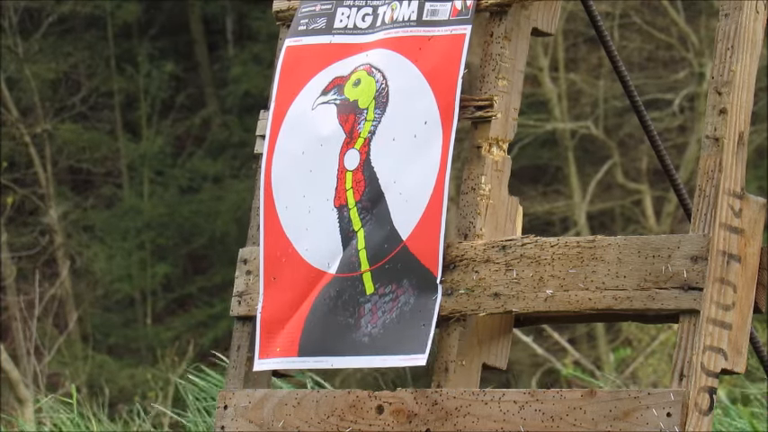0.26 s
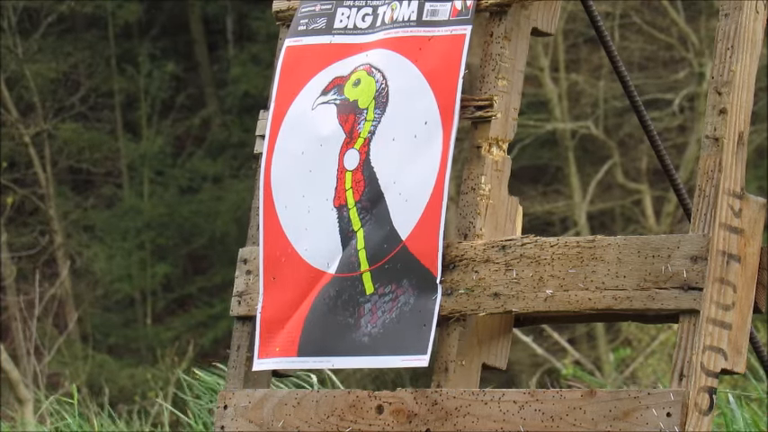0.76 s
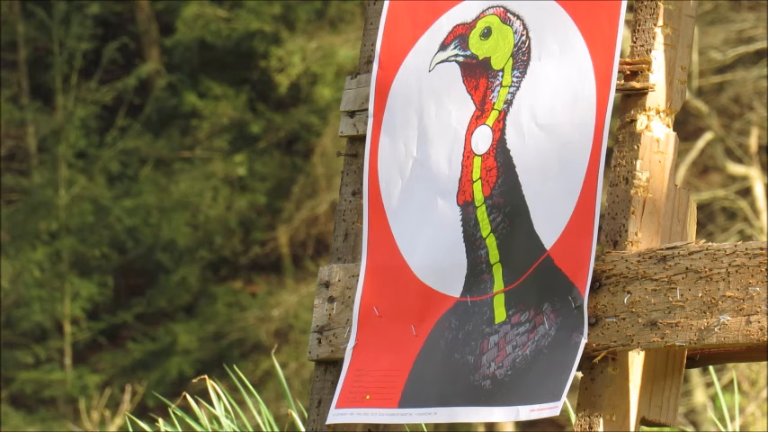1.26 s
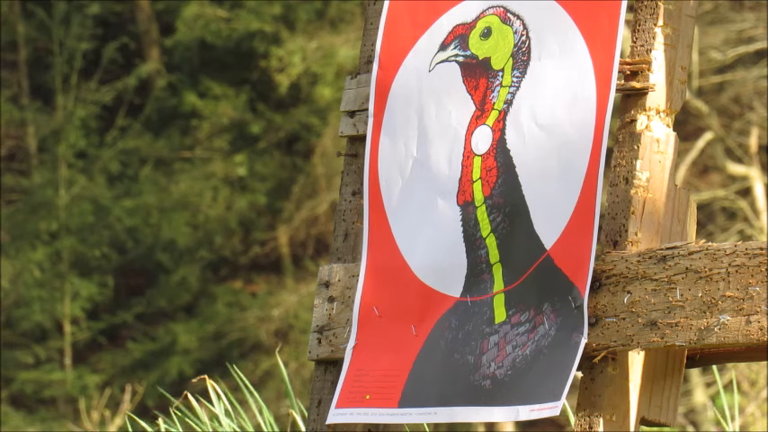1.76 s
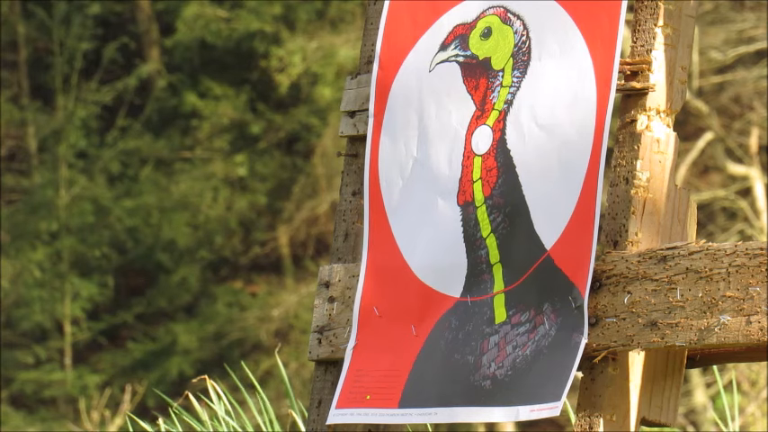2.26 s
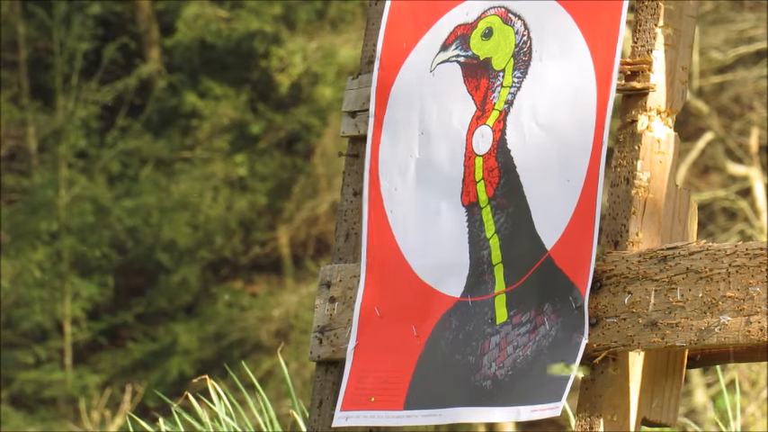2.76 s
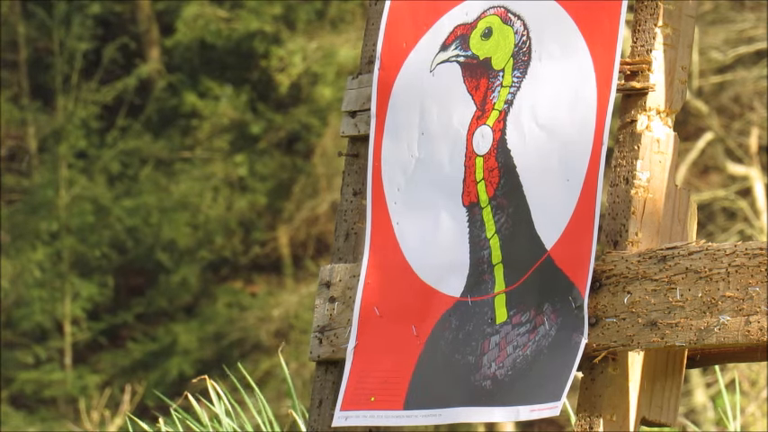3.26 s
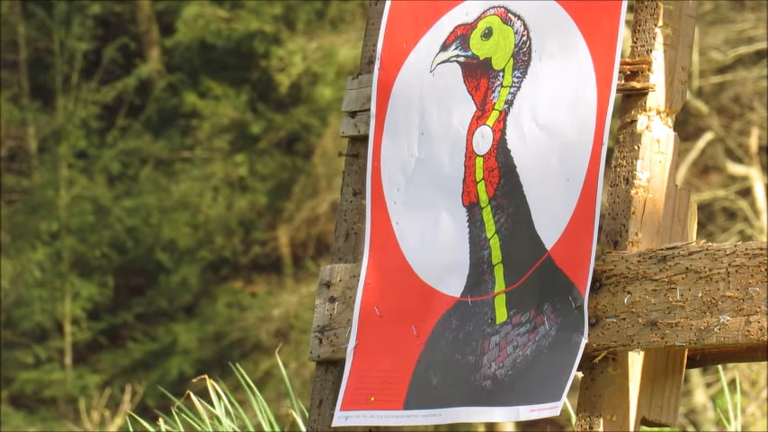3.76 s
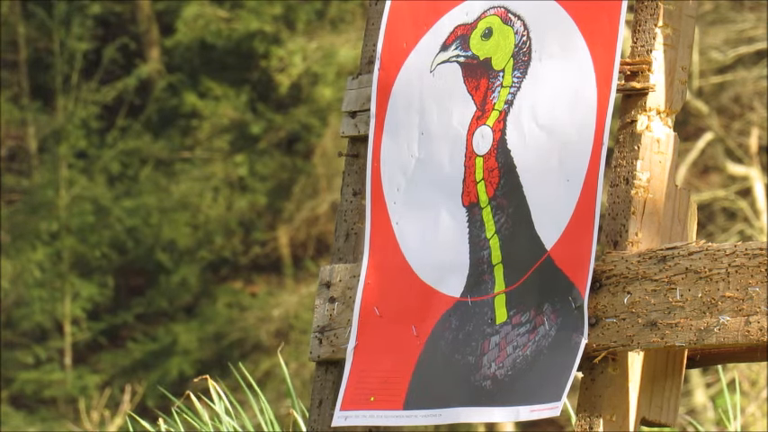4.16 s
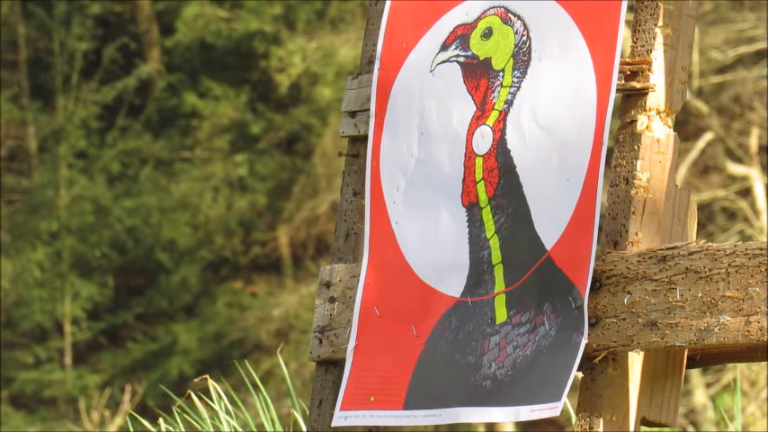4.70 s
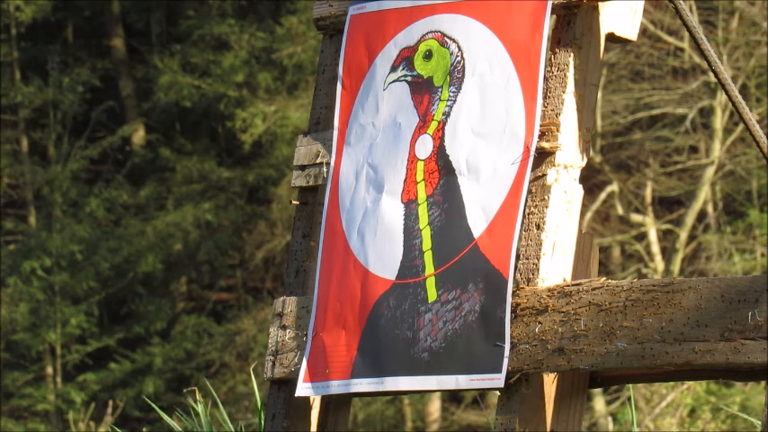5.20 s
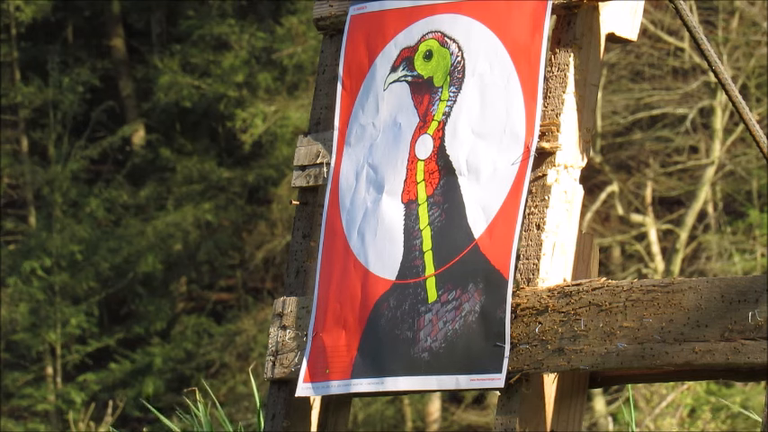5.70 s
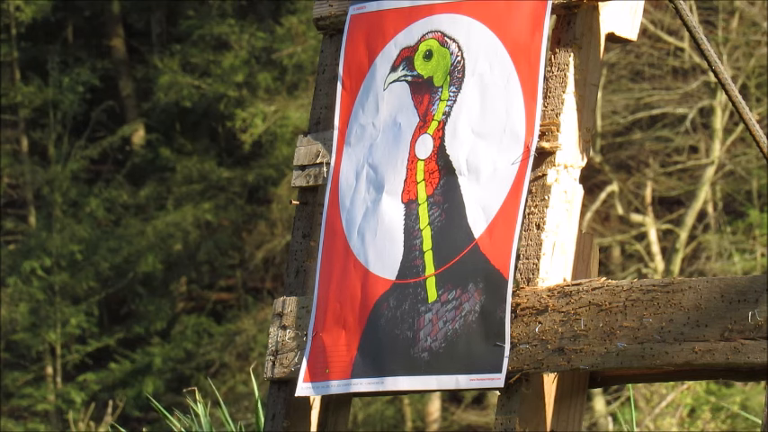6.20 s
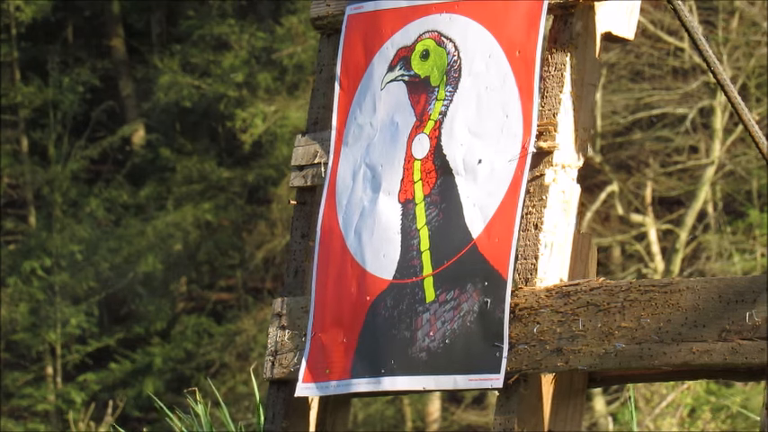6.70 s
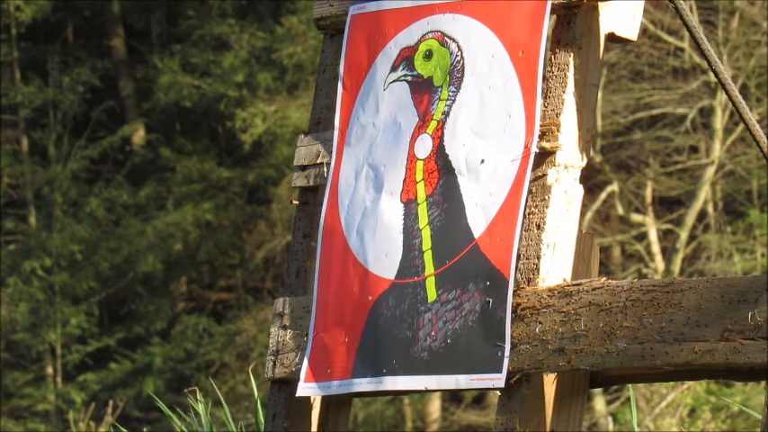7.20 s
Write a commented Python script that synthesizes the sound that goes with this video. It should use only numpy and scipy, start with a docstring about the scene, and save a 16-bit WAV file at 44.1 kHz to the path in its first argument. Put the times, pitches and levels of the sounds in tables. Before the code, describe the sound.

In an open wooded valley, the tail of an earlier shot fades during the first second beneath strong, low wind gusts and sharp buffets, with a few tiny ticks. At 0.9 the air changes abruptly and a short bird whistle sounds; gusts continue, with a hard thump near 2.06. At about 2.45 a flintlock pan fizzes, and at 2.53 a huge, flat-clipped bang hits. Pellets spatter the paper target and wooden frame around 2.6, then trees scatter the crack and a hillside rolls it back from about 3.0, fading and dulling. Wind is lighter; faint raspy chips come at 4.2-4.8. At 5.04 the ambience shifts again, and clear gliding whistles and falling slurs grow busy until 6.6, with soft wind bumps near 5.8-6.0. A second fizz and overloaded blast arrive at 6.58, pellets at 6.64, and a rolling echo from 7.1 continues to the end at about 7.45.

```python
"""The echo of an earlier shot is dying away while wind buffets the microphone, outdoors in a wooded valley.
Two flintlock shotgun shots follow: the pan fizzes, the blast overloads the microphone and pellets spatter
a paper target on a wooden frame; trees scatter the bang and a hillside rolls it back.
Noise shaped by spectrum and decay makes air, wind, trees, hill and frame; pressure pulses make the blasts.
Birds whistle in gliding near sines; the level of the surroundings steps down or up, then climbs to full."""
import sys
import numpy as np
from scipy import signal
from scipy.fft import rfft, irfft, next_fast_len
from scipy.io import wavfile
from scipy.ndimage import uniform_filter1d

SR = 44100
rng = np.random.default_rng(int(sys.argv[2]) if len(sys.argv) > 2 else 0)


def master_out(mix):
    """Clip the mix to full scale and print it as 16-bit PCM to the path in sys.argv[1]."""
    frames = np.transpose(np.atleast_2d(mix))
    ceiling = np.clip(frames, -1, 1)
    pcm = np.round(ceiling * 32767).astype(np.int16)
    wavfile.write(sys.argv[1], SR, pcm)


N = 328545
TIME = np.arange(N) / SR
OPPOSITE = np.array([[1], [-1]])  # left +, right -

# far-off air in three stretches; rolls and gusts stop where the next begins: start_s, level_db
STRETCHES = [(0, -44), (.902, -47), (5.04, -44.5)]
# level of the surroundings from each moment on, stepping down or up,
# then climbing steadily to full level: start_s, level_db
SURROUNDINGS = [(0, -7.5), (.668, -10.5), (.902, -3.5), (2.066, -6.5), (2.53, -17), (5.04, 0), (6.58, -17)]
RECOVER_DB_PER_S, HISS_DB = 3.5, -63.5

# spectra, relative levels: frequency_hz, level_db
AIR_SPECTRUM = [(20, -20), (60, -2.5), (130, 2.5), (300, -6.5), (500, -8), (1000, -14.5), (2000, -26.5),
                (4000, -42.5), (8000, -55.5)]
HISS_SPECTRUM = [(100, -0.5), (2000, 0.5), (5000, -3), (10000, -1.5), (14000, -8), (16000, -8.5)]
GUST_SPECTRUM = [(15, -25), (25, -19.5), (50, -6), (100, 0.5), (150, -1), (220, -6.5), (320, -17),
                 (450, -23.5), (600, -34), (900, -47.5), (1500, -64.5), (4000, -89.5)]
SPLASH_SPECTRUM = [(40, -16), (130, -8), (300, -5.5), (500, -5.5), (1000, -7), (1300, -10), (1700, -3),
                   (3000, -11), (6000, -15.5), (10000, -18.5), (15000, -26)]
TREES_SPECTRUM = [(30, -24), (70, -9.5), (140, 2.5), (260, -1.5), (420, -8.5), (1000, -14.5), (1600, -14),
                  (3000, -15.5), (5000, -21), (10000, -21.5), (15000, -21.5)]
HILL_SPECTRUM = [(25, -43), (60, -8.5), (130, 0), (300, -1.5), (500, -13.5), (1000, -12.5), (1500, -11),
                 (2200, -14.5), (3200, -17.5), (5000, -21.5), (9000, -29)]
FRAME_SPECTRUM = [(200, -8.5), (800, -13.5), (1500, -8), (2300, -2.5), (2750, -1.5), (3200, -1), (3700, -1),
                  (5000, -7), (7000, -6), (10000, -9.5), (15000, -14.5)]
FLASH_SPECTRUM = [(300, -16.5), (1500, 3.5), (4000, -3.5), (8000, -3.5), (12000, -3), (15000, -7.5)]
# stereo width of sound from the range: frequency_hz, side_minus_mid_db
WIDTH = [(60, -0.5), (200, -10.5), (1000, -6), (2500, -16.5), (4500, -12.5), (8000, -1), (15000, 2.5)]

# each shot rolling back from the hillside, counted from a moment shortly before or at the bang:
# counted_from_s, way_there_and_back_s, relative_level_db
ROLLS = [(-1.17, 0.59, -35), (2.5, 0.55, -28.5), (6.5, .61, -29.5)]
ROLL_RISE_S, ROLL_HOLD_S, ROLL_FADE_DB_PER_S = 0.038, .22, 18.5
# a nearer edge of the wood answers first, briefly
EDGE_DELAY_S, EDGE_WIDTH_S, EDGE_DB = .465, .013, -13
# the farther slopes keep a faint rumble going
LATE_DB, LATE_FADE_DB_PER_S = -18.5, 4.0

# bird calls: pitch contours in Hz, evenly spaced, with lengths in seconds; repeats: start_s, level_db
CHIP_CONTOUR_HZ = [3850, 4260, 3900, 2950]
CHIP_S, CHIP_RASP = 0.1, .03
CHIPS = [(4.195, -71), (4.345, -67.5), (4.53, -69), (4.708, -68.5)]
HOOK_CONTOUR_HZ = [2947, 3600, 3430, 3070, 3170]
HOOK_S = 0.081
HOOKS = [(5.162, -59.5), (5.64, -54.5), (6.111, -51)]
SLUR_CONTOUR_HZ = [2210, 1845, 1663]
SLUR_S = .215
SLURS = [(5.415, -59), (5.89, -56), (6.385, -56.5)]
# plain gliding whistles: start_s, length_s, first_hz, last_hz, level_db
GLIDES = [(.904, 0.076, 2341, 2342, -51), (.905, .1, 2800, 2720, -68), (1.04, 0.053, 2350, 2290, -62),
          (4.916, 0.032, 2230, 2290, -64), (5.238, 0.023, 3080, 3120, -56.5),
          (5.42, 0.043, 2160, 2130, -55.5), (5.761, 0.027, 3550, 3900, -58.5),
          (5.822, 0.026, 2820, 2190, -56.5), (5.886, 0.044, 2230, 2330, -53.5),
          (5.979, .04, 4400, 3580, -55.5), (6.027, 0.14, 2950, 2750, -53.5),
          (6.165, .015, 5900, 5700, -60.5), (6.184, 0.087, 2790, 2380, -52),
          (6.194, .035, 4550, 5150, -57.5), (6.255, .041, 3200, 3800, -56.5),
          (6.322, 0.034, 2825, 2020, -50), (6.357, .085, 2020, 2330, -53),
          (6.477, 0.041, 4350, 3750, -52.5), (6.518, 0.088, 2880, 2860, -49.5)]

# small ticks: start_s, peak_db, centre_hz
TICKS = [(.161, -54, 12000), (0.215, -55, 8000), (.621, -52, 6500), (0.664, -45, 2000), (0.82, -54.5, 9050),
         (.902, -42, 2200), (2.062, -37, 1500), (2.794, -37, 9270), (2.81, -35, 6500), (3.146, -58, 8000),
         (5.041, -48.5, 2980)]

# steady breeze on the microphone, before the surroundings' gain: time_s, level_db
BREEZE = [(0, -27), (.8, -21), (.95, -42), (1.15, -28), (1.55, -29.5), (1.85, -40.5), (2.2, -23.5),
          (2.85, -39.5), (3.7, -35.5), (4.4, -57), (5.3, -44.5), (6.1, -41.5), (6.8, -52), (7.45, -37.5)]
# gusts that swell and fall back: centre_s, peak_db, half_width_s (to 1/e of the peak)
GUSTS = [(0.036, -27.5, .035), (0.228, -17, 0.058), (0.361, -18, 0.031), (.54, -22, 0.068),
         (0.679, -14.5, 0.069), (0.856, -17, .045), (1.067, -21, 0.043), (1.319, -20.5, 0.057),
         (1.435, -13, .02), (2.087, -22.5, 0.051), (2.227, -24.5, .03), (2.353, -21.5, 0.015),
         (2.512, -28, .035), (3.631, -39, 0.06), (4.122, -38, 0.019), (4.25, -40, .03), (5.773, -32, .07),
         (5.958, -28.5, 0.068), (7.192, -39, 0.032)]
# sharpness of the wind: time_s, tilt_db_per_octave
WIND_TILT = [(0, 8.5), (.9, 4.0), (.92, -2.5), (2.0, -2), (2.3, -2), (2.6, -3), (7.45, 3)]
# hard eddies hitting the ports: centre_s, relative_peak_db, first_width_ms, side_pushed_first, wake_t60_s
BUFFETS = [(.208, -14, .9, 1, .02), (.362, -14, .9, 1, .02), (.492, -11, 0.82, -1, .03),
           (.626, -8.5, 1.16, 1, 0.022), (.6652, -2.5, 1.17, 1, .12), (.81, -13.5, 0.71, -1, .02),
           (.863, -17, 1.3, 1, 0.022), (1.434, -12.5, 1.5, 1, 0.022), (2.0637, 1, 1.06, 1, 0.14),
           (2.254, -2, 1.29, 1, 0.012), (5.781, -9.5, 2.9, 1, 0.018), (5.948, -5.5, 2.2, -1, 0.023),
           (6.012, -6, 1.9, -1, 0.029)]
# in the wake each eddy comes later and is wider than the last, by the growth factor
WAKE_GAP_S, WAKE_GROWTH = .0068, 1.214

# shots: start_s, blast_db, base_pulse_ms, shock_front_hz, ground_bounce_ms, low_thud_db (added to blast_db),
# pan_flash_lead_s, pan_flash_db, pellet_flight_s, pellet_db
SHOTS = [(2.5279, 11, 1.04, 600, 1.97, -15.5, .082, -55.5, 0.07, -24.5),
         (6.5754, 13, 1.23, 490, 2.237, -21, .086, -51.5, 0.064, -25)]
# the blast straight from the gun, then off the ground: level_db, pulse_stretch
DIRECT = (-1.1, 0.87)
GROUND = (0.52, 1.45)
# the blast off nearby things: delay_ms, level_db, pulse_stretch
PATHS = [(4.84, -6, 3.5), (10.2, -16.5, 1.1), (13.4, -16, 1.05)]

CUTOFF_HZ = 15300


def from_db(db):
    """Decibels to gain."""
    return 10 ** (np.asarray(db) / 20)


def rms_one(x):
    """Scale to rms 1."""
    return x / np.sqrt(np.mean(x ** 2) + 1e-20)


def in_time(rows):
    """Each column of a curve at every sample."""
    s, *columns = np.transpose(rows)
    return [np.interp(TIME, s, c) for c in columns]


def latest(rows):
    """At every sample, the columns of the last row that has begun."""
    rows = np.array(rows)
    begun = np.searchsorted(rows[:, 0], TIME, "right") - 1
    return rows[np.maximum(begun, 0)].T


def until_next_stretch(s):
    """1 until the first stretch that starts after time s, then 0."""
    return TIME < min([start for start, _ in STRETCHES[1:] if start > s], default=np.inf)


def wander(size, step_s):
    """Random values joined by straight lines; the values have spread 1."""
    return np.interp(TIME[:size] / step_s, np.arange(2000), rng.standard_normal(2000))


def dying(age, t60):
    """Exponential decay by 60 dB in t60 seconds."""
    return from_db(-60 * age / t60)


def add(out, s, x):
    """Mix x into out from time s on."""
    i = max(round(s * SR), 0)
    out[..., i:i + x.shape[-1]] += x[..., :max(N - i, 0)]


def butter(x, hz, kind, order=2):
    """Causal Butterworth filter."""
    hz = np.clip(hz, 10, .45 * SR)
    return signal.sosfilt(signal.butter(order, hz, kind, fs=SR, output="sos"), x + 1e-18)


def gain_at(spectrum, hz):
    """Read a spectrum on a log-frequency axis, as gain."""
    points, db = np.transpose(spectrum)
    return from_db(np.interp(np.log(hz + 1), np.log(points), db))


def shape(x, spectrum):
    """Give a steady signal a spectrum."""
    size = next_fast_len(x.shape[-1])
    gain = gain_at(spectrum, np.fft.rfftfreq(size, 1 / SR))
    return irfft(rfft(x, size) * gain, size)[..., :x.shape[-1]]


def octaves(x):
    """Split noise into overlapping octave bands that sum to the whole: (centre Hz, band)."""
    size, centres = next_fast_len(x.shape[-1]), np.geomspace(31.25, 16000, 10)
    whole, log_hz = rfft(x, size), np.log(np.fft.rfftfreq(size, 1 / SR) + 1)
    for hz, weights in zip(centres, np.eye(len(centres))):
        window = np.interp(log_hz, np.log(centres), weights)
        yield hz, irfft(whole * window, size)[..., :x.shape[-1]]


def field(spectrum, size):
    """Stereo noise from the range, its mid-to-side balance set by WIDTH; rms 1."""
    mid, side = shape(rng.standard_normal((2, size)), spectrum)
    return rms_one(mid + OPPOSITE * shape(side, WIDTH))


def surroundings_gain():
    """Gain of the surroundings: it steps down or up at each row, then climbs steadily to full level."""
    since, level_db = latest(SURROUNDINGS)
    return from_db(np.minimum(level_db + RECOVER_DB_PER_S * (TIME - since), 0))


def background():
    """Far-off air in the valley and the microphone's own hiss, both steady noise under the shared gain."""
    air = from_db(latest(STRETCHES)[1]) * field(AIR_SPECTRUM, N)
    hiss = rms_one(shape(rng.standard_normal((2, N)), HISS_SPECTRUM))
    return surroundings_gain() * (air + from_db(HISS_DB) * hiss)


def hillside(level_db=10.5, air_db_per_s_khz=10.0, ragged_db=1.7, ragged_s=.012):
    """The wooded slope rolls each shot back: a swell, a hold, a long fade; air takes ever more treble."""
    level = np.zeros(N)
    for counted_from, way_s, db in ROLLS:
        since = TIME - counted_from - way_s
        swell = (1 + np.tanh(since / ROLL_RISE_S / 2)) / 2
        fade = from_db(-ROLL_FADE_DB_PER_S * np.maximum(since - ROLL_HOLD_S, 0))
        late = from_db(LATE_DB - LATE_FADE_DB_PER_S * np.maximum(since, 0))
        edge = from_db(EDGE_DB) * np.exp(-((TIME - counted_from - EDGE_DELAY_S) / EDGE_WIDTH_S) ** 2)
        level += from_db(db) * (swell * np.hypot(fade, late) + edge) * until_next_stretch(counted_from)
    age = TIME - latest(ROLLS)[0]
    roll = 0
    for hz, band in octaves(field(HILL_SPECTRUM, N)):
        khz_above_1 = max(hz / 1e3 - 1, 0)
        roll = roll + band * from_db(-air_db_per_s_khz * age * khz_above_1)
    # single trunks and ridges make the roll ragged
    return from_db(level_db + ragged_db * wander(N, ragged_s)) * level * roll * surroundings_gain()


def whistle(length, contour_hz, rasp=0.0031, rasp_s=0.0013, flutter_db=2.5, flutter_s=.0124):
    """A near sine that glides smoothly through its contour and flutters in pitch and strength."""
    along = np.linspace(0, 1, round(length * SR))
    glide = np.polyfit(np.linspace(0, 1, len(contour_hz)), contour_hz, len(contour_hz) - 1)
    hz = np.polyval(glide, along) * (1 + rasp * wander(len(along), rasp_s))
    swell = np.sqrt(np.abs(np.sin(np.pi * along)))
    flutter = from_db(flutter_db * wander(len(along), flutter_s))
    return swell * flutter * np.sin(2 * np.pi * np.cumsum(hz) / SR)


def birds(woods_db=-5.5, woods_t60=0.7, near_db=-50, farness=0.22):
    """Raspy chips, hooks, falling slurs and glides echo in the woods; far, faint ones keep less direct sound."""
    notes = [(s, db, whistle(CHIP_S, CHIP_CONTOUR_HZ, CHIP_RASP)) for s, db in CHIPS]
    notes += [(s, db, whistle(HOOK_S, HOOK_CONTOUR_HZ)) for s, db in HOOKS]
    notes += [(s, db, whistle(SLUR_S, SLUR_CONTOUR_HZ)) for s, db in SLURS]
    notes += [(s, db, whistle(length, [first_hz, last_hz])) for s, length, first_hz, last_hz, db in GLIDES]
    direct, into_woods = np.zeros((2, N))
    for s, db, note in notes:
        add(into_woods, s, from_db(db) * note)
        add(direct, s, from_db(db + farness * min(db - near_db, 0)) * note)
    echoes = field(HISS_SPECTRUM, SR) * dying(TIME[:SR], woods_t60)
    echoes /= np.sqrt(np.sum(echoes[0] ** 2))
    woods = signal.fftconvolve(into_woods[None], echoes, axes=1)[:, :N]
    return direct + from_db(woods_db) * woods


def ticks(t60=0.012):
    """Tiny dry clicks, each a broad band of noise that dies at once."""
    out, age = np.zeros((2, N)), TIME[:SR // 20]
    for s, peak_db, hz in TICKS:
        burst = rng.standard_normal(len(age)) * dying(age, t60)
        tick = butter(burst, [hz / 2, hz * 1.22], "band", order=1)
        add(out, s, from_db(peak_db) * tick / np.abs(tick).max())
    return out


def wind_strength():
    """The breeze with its bell-shaped gusts, summed as power and returned as gain."""
    power = (from_db(in_time(BREEZE)[0]) * surroundings_gain()) ** 2
    for s, peak_db, half_s in GUSTS:
        gust = from_db(peak_db) * np.exp(-((TIME - s) / half_s) ** 2)
        power = power + (gust * until_next_stretch(s)) ** 2
    return np.sqrt(power)


def wind(common_db=-15, pivot_hz=130, sharpest_hz=400, lean_db=0.88, even_s=0.023):
    """Turbulence pushes the two microphone ports in opposite senses; the tilt sets how sharp the eddies are."""
    tilt, = in_time(WIND_TILT)
    eddies = 0
    for hz, band in octaves(shape(rng.standard_normal((2, N)), GUST_SPECTRUM)):
        # the tilt turns about the pivot and folds back above the sharpest frequency
        octaves_up = np.log2(sharpest_hz / pivot_hz) - abs(np.log2(hz / sharpest_hz))
        eddies = eddies + band * from_db(tilt * octaves_up)
    # even out the running level so that wind_strength alone sets it
    across, common = eddies / np.sqrt(uniform_filter1d(eddies ** 2, round(even_s * SR)) + 1e-12)
    ports = OPPOSITE * across + from_db(common_db) * common
    return wind_strength() * from_db(-lean_db * OPPOSITE) * ports


def buffets(low_cut_hz=75, level_db=3.0, lean_db=2.5, count=4):
    """An eddy is a smooth pressure bump of opposite sign at the two ports; weaker ones follow, alternating."""
    out = np.zeros((2, N))
    ms = np.arange(-SR // 100, SR // 100) * 1000 / SR
    for s, peak_db, width_ms, sense, wake_t60 in BUFFETS:
        lag = 0
        for k in range(count):
            ports = sense * (-1) ** k * OPPOSITE
            growth = WAKE_GROWTH ** k
            bump = dying(lag, wake_t60) * np.exp(-(ms / (width_ms * growth)) ** 2)
            add(out, s + lag + ms[0] / 1000, ports * from_db(peak_db - lean_db * ports) * bump)
            lag += WAKE_GAP_S * growth
    return from_db(level_db) * butter(out, low_cut_hz, "high")  # the microphone's bass cut


def pan_flash(lead_s, level_db, strike_db=-3.0, strike_s=0.016, strike_width_s=0.0046):
    """Flint scrapes the steel and the priming fizzes until the main charge catches."""
    age = TIME[:round(lead_s * SR)]
    strike = from_db(strike_db) * np.exp(-((age - strike_s) / strike_width_s) ** 2)
    fizz = np.minimum(age / strike_width_s, 1)
    return from_db(level_db) * field(FLASH_SPECTRUM, len(age)) * (fizz + strike)


def pellets(level_db, spread_s=.005, straggle_t60=0.27, ring_db=-4, ring_t60=0.15, count=400):
    """The shot arrives as a swarm of tiny hits on paper and wood, stragglers weaker; the frame rings on."""
    age = TIME[:SR // 3]
    hits = np.zeros(len(age))
    at = np.minimum(rng.gamma(1.3, spread_s, count) * SR, len(age) - 1).astype(int)
    hits[at] = rng.standard_normal(count)
    spatter = shape(hits * dying(age, straggle_t60), FRAME_SPECTRUM)
    opening_rms = np.sqrt(np.mean(spatter[:SR // 60] ** 2))
    spatter = spatter / opening_rms * (age < age[-1] / 2)
    ring = field(FRAME_SPECTRUM, len(age)) * dying(age, ring_t60) * (1 - np.exp(-age / spread_s))
    return from_db(level_db) * (spatter + from_db(ring_db) * ring)


def scatter(crack_db=-12, crack_t60=0.031, splash_db=-19, splash_s=0.013, splash_t60=0.1, grass_db=-27,
            grass_t60=.27, trees_db=-33, fade_db_per_s=18, air_db_per_s_khz=7.5, build_s=0.063):
    """A ragged crack, a splash off nearby timber, a wash off the grass; trees scatter it on, ever duller."""
    age = TIME[:SR * 3 // 2]
    crack = from_db(crack_db) * dying(age, crack_t60)
    timber = from_db(splash_db) * (age > splash_s) * dying(np.abs(age - splash_s), splash_t60)
    grass = from_db(grass_db) * dying(age, grass_t60)
    near = field(SPLASH_SPECTRUM, len(age)) * np.sqrt(crack ** 2 + timber ** 2 + grass ** 2)
    trees = sum(band * from_db(-age * (fade_db_per_s + air_db_per_s_khz * hz / 1e3))
                for hz, band in octaves(field(TREES_SPECTRUM, len(age))))
    build = 1 - np.exp(-age / build_s)
    to_silence = 1 - (age / age[-1]) ** 4
    return near + from_db(trees_db) * trees * build * to_silence


def blast(level_db, length_ms, front_hz, ground_ms, thud_db, low_cut_hz=116, boom_q=3.0, skew_db=1.1,
          mismatch_db=0.8, thud_hz=38):
    """A shock front and its suction arrive by several paths; the two unequal capsules' bass cuts ring after."""
    ms, pressure = TIME[:SR // 4] * 1000, 0
    for delay_ms, path_db, stretch in [(0, *DIRECT), (ground_ms, *GROUND)] + PATHS:
        phase = np.maximum(ms - delay_ms, 0) / (length_ms * stretch)
        pulse = (ms >= delay_ms) * (1 - phase) * np.exp(-phase)
        # a longer pulse has a softer front, with its corner at twice front_hz over the stretch
        pressure = pressure - from_db(path_db) * butter(pulse, 2 * front_hz / stretch, "low")
    heard = []
    for w in 2 * np.pi * low_cut_hz * from_db(mismatch_db * OPPOSITE[:, 0]):
        bass_cut = signal.bilinear([1, 0, 0], [1, w / boom_q, w * w], SR)
        heard.append(signal.lfilter(*bass_cut, pressure))
    # a slow, quickly damped low swing under the bang
    cycles = ms / 1000 * thud_hz
    thud = np.sin(2 * np.pi * cycles) * np.exp(-np.pi * cycles) / 2
    return from_db(level_db - skew_db * OPPOSITE) * (np.array(heard) + from_db(thud_db) * thud)


def scene():
    """The shots, then everything around them."""
    out = np.zeros((2, N))
    for s, blast_db, length_ms, front_hz, ground_ms, thud_db, lead_s, flash_db, flight_s, pellet_db in SHOTS:
        add(out, s - lead_s, pan_flash(lead_s, flash_db))
        add(out, s, blast(blast_db, length_ms, front_hz, ground_ms, thud_db))
        add(out, s, scatter())
        add(out, s + flight_s, pellets(pellet_db))
    return out + hillside() + wind() + buffets() + ticks() + birds() + background()


def record(dry, notch_hz=690, notch_q=2.05, notch_depth=0.85):
    """The microphone has a hollow in the midrange, the blasts clip flat, the top is cut."""
    hollow = signal.lfilter(*signal.iirpeak(notch_hz, notch_q, fs=SR), dry)
    coloured = dry - notch_depth * hollow
    clipped = coloured / (1 + coloured ** 14) ** (1 / 14)
    top_cut = signal.ellip(12, .1, 110, CUTOFF_HZ, fs=SR, output="sos")
    return signal.sosfilt(top_cut, .98 * clipped)


dry = scene()
out = record(dry)
master_out(out)
```